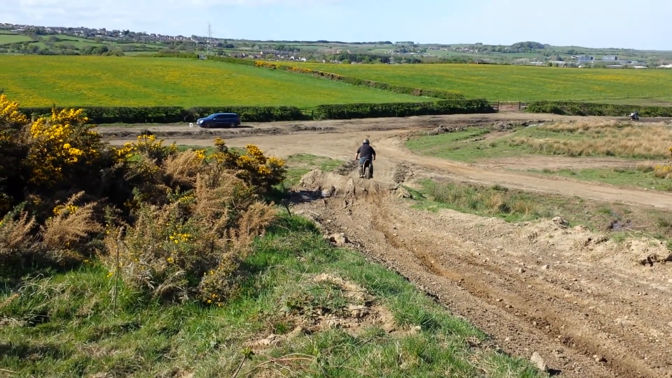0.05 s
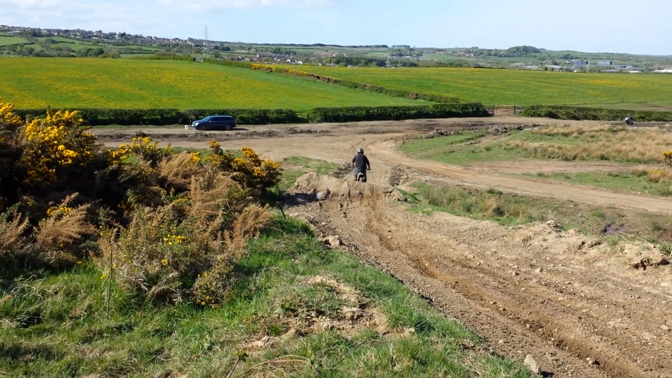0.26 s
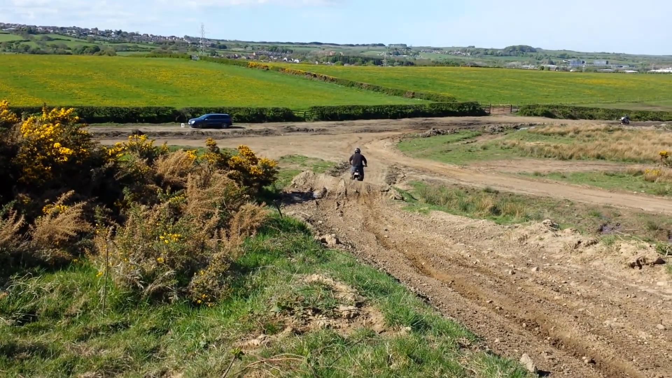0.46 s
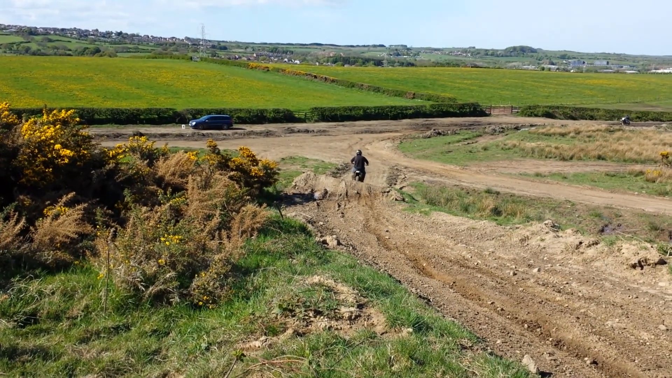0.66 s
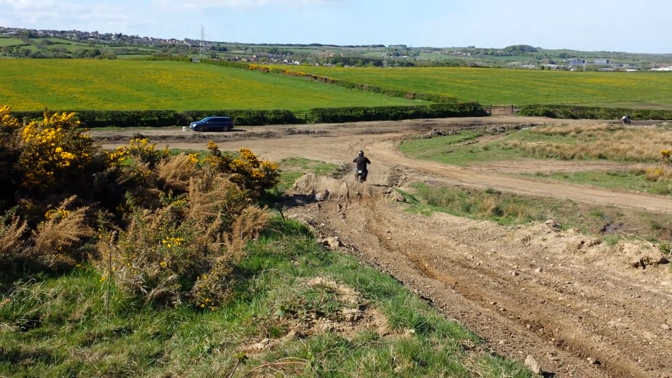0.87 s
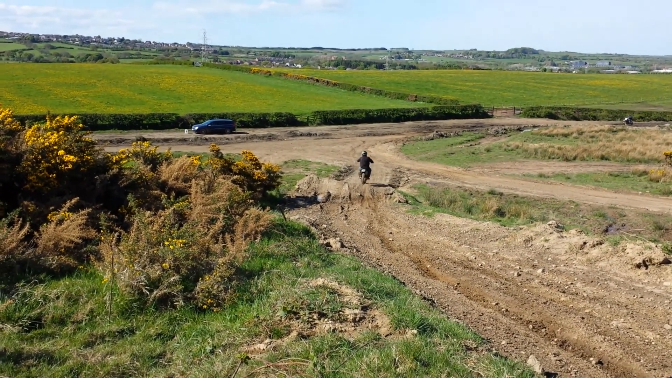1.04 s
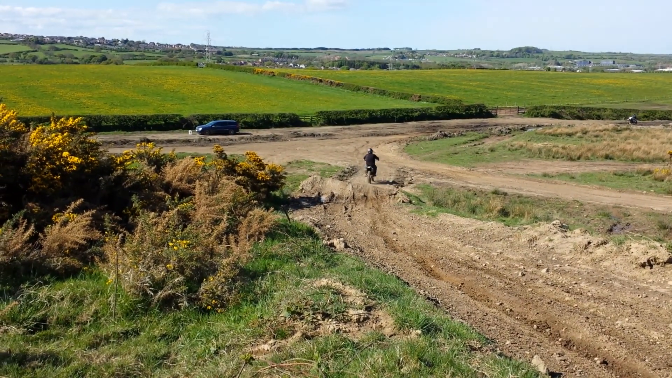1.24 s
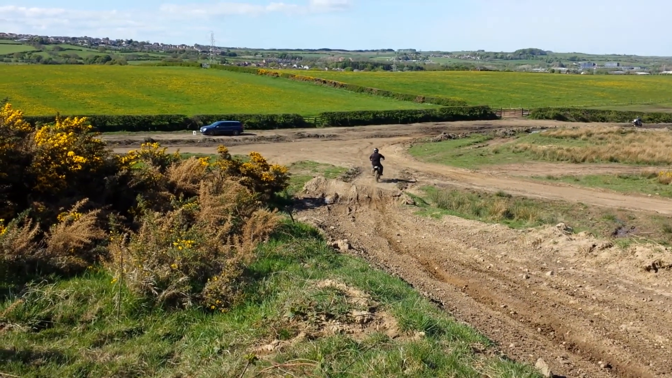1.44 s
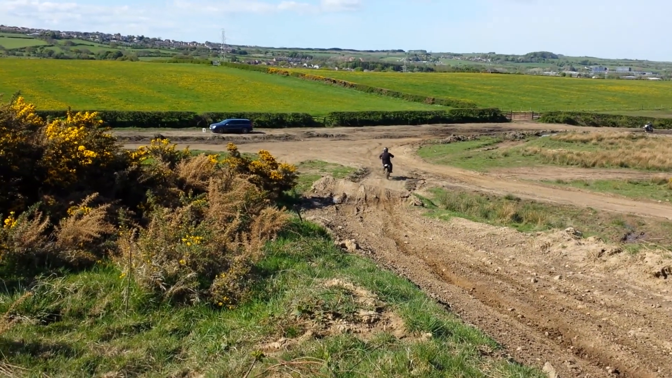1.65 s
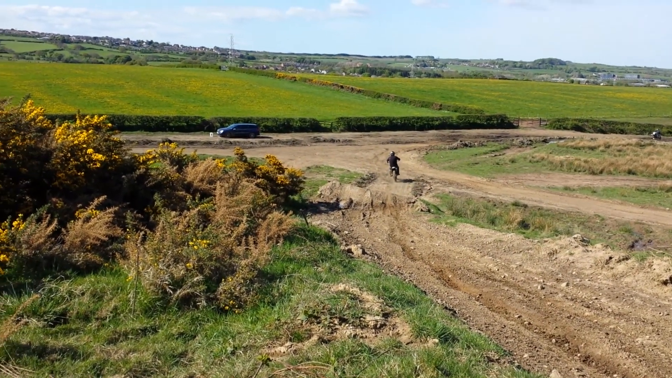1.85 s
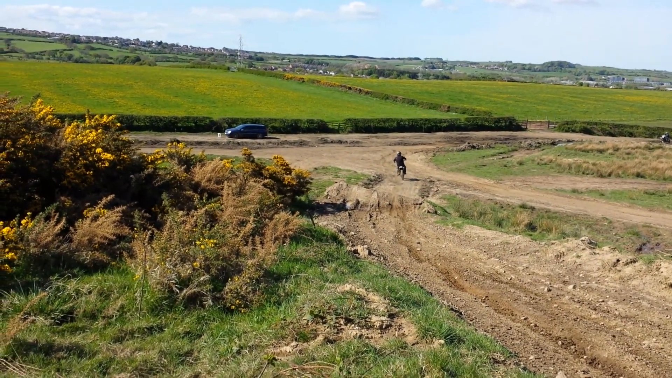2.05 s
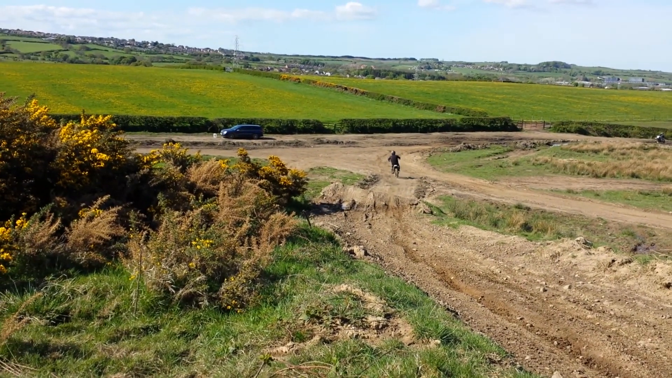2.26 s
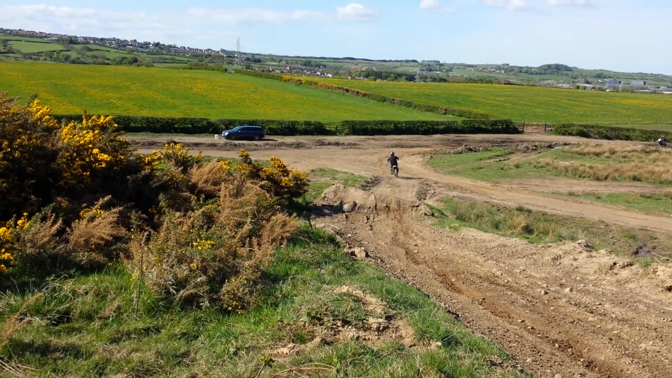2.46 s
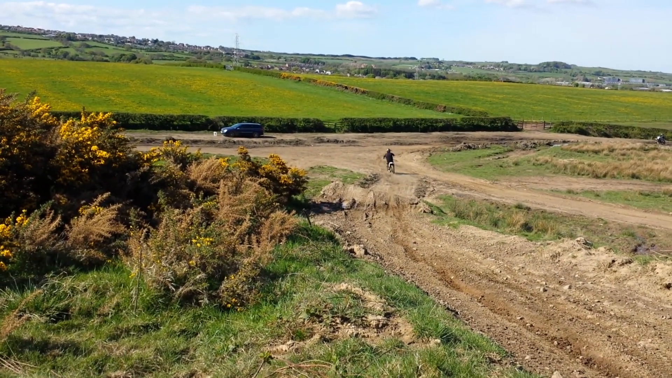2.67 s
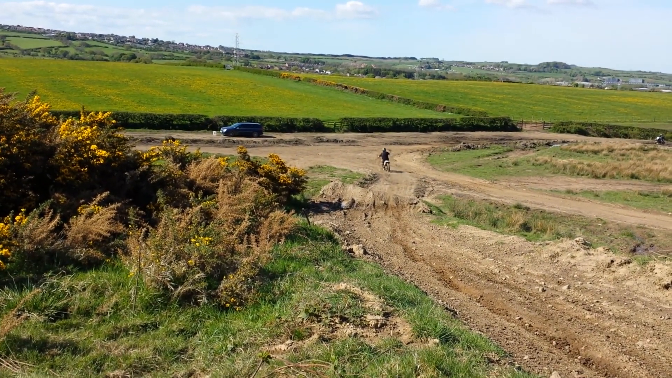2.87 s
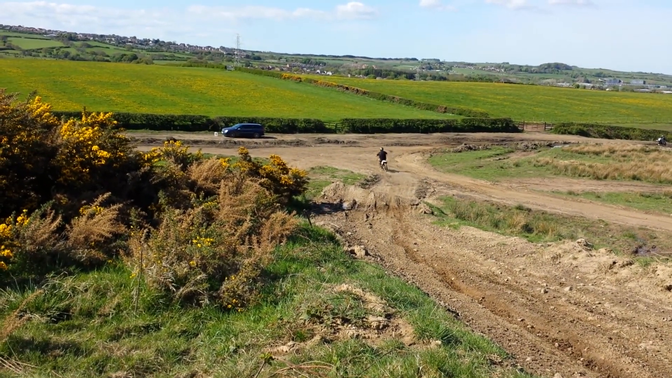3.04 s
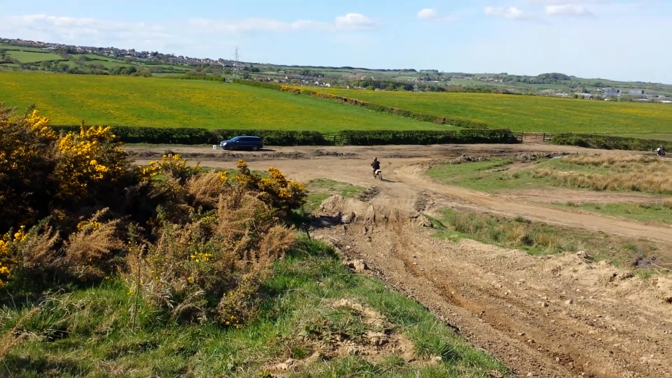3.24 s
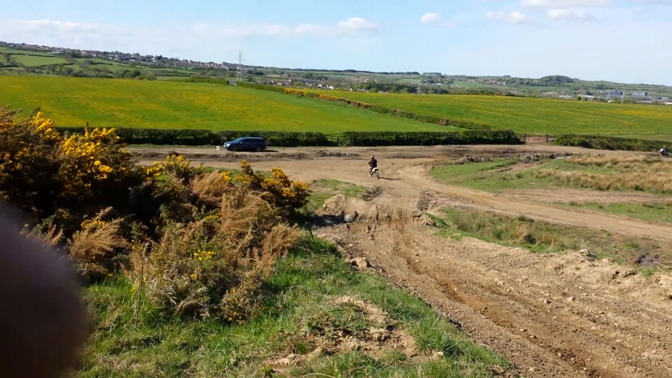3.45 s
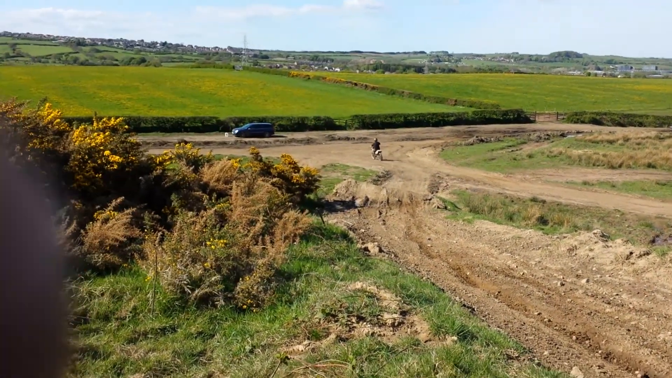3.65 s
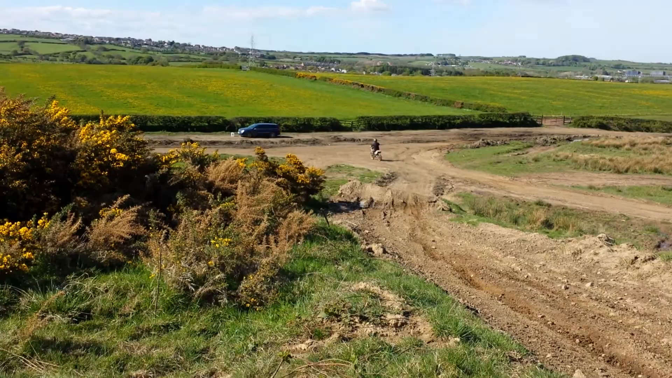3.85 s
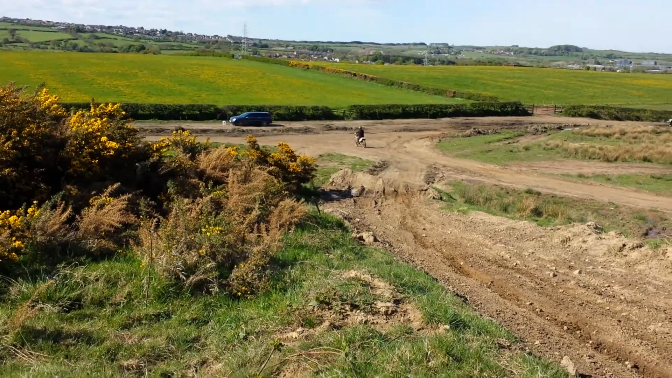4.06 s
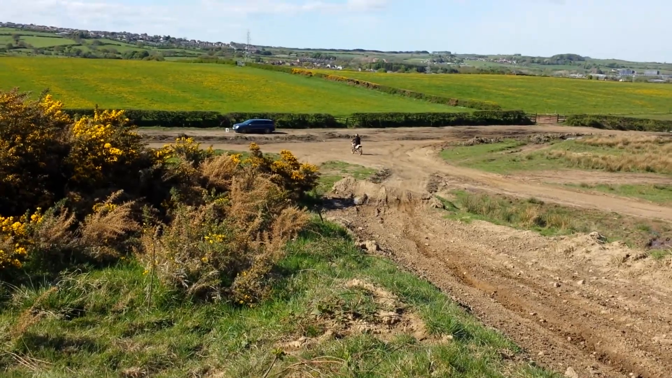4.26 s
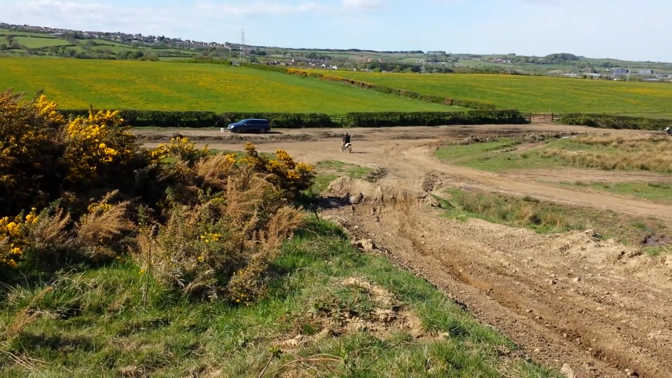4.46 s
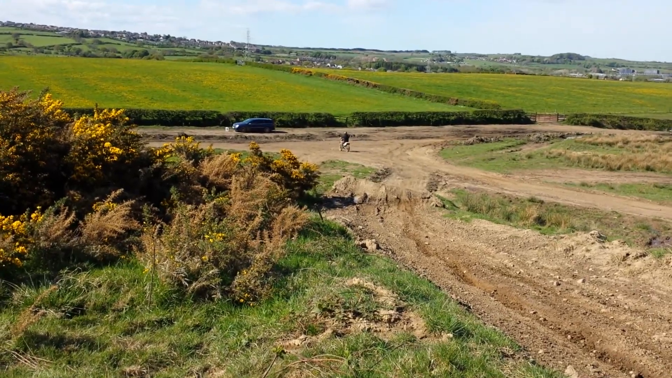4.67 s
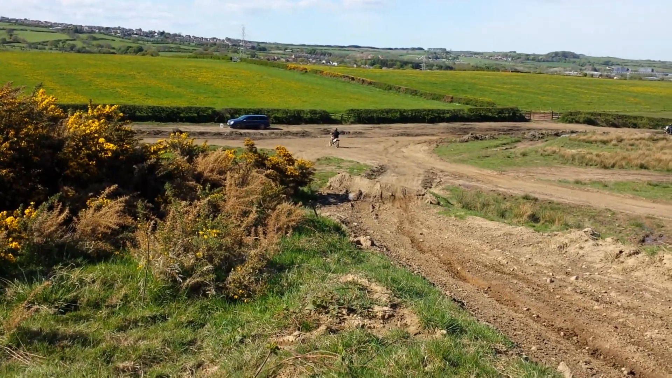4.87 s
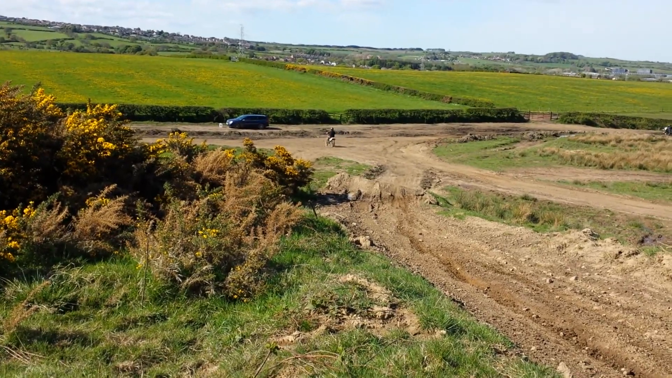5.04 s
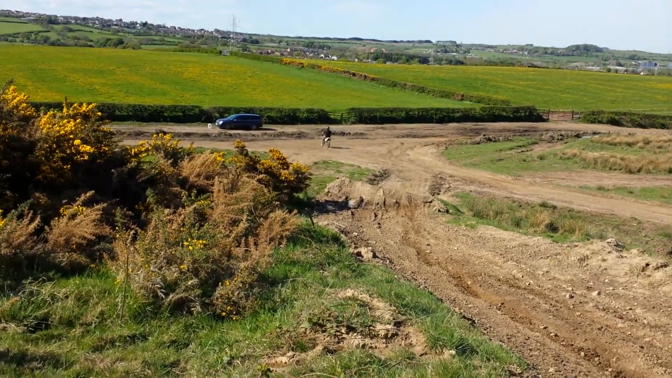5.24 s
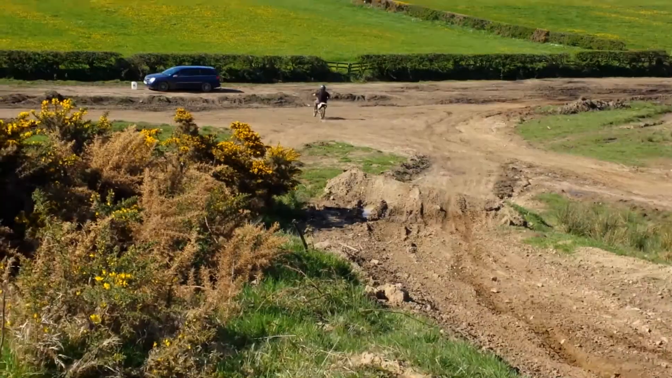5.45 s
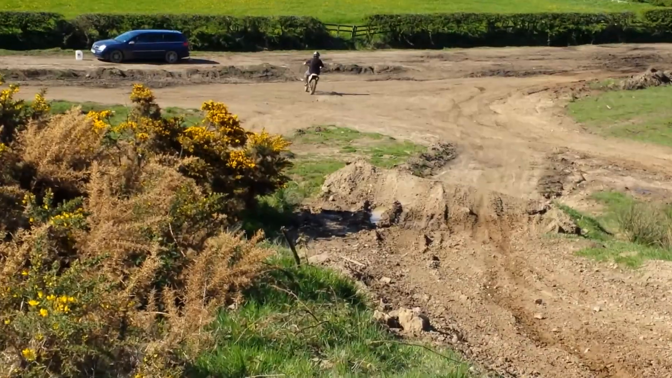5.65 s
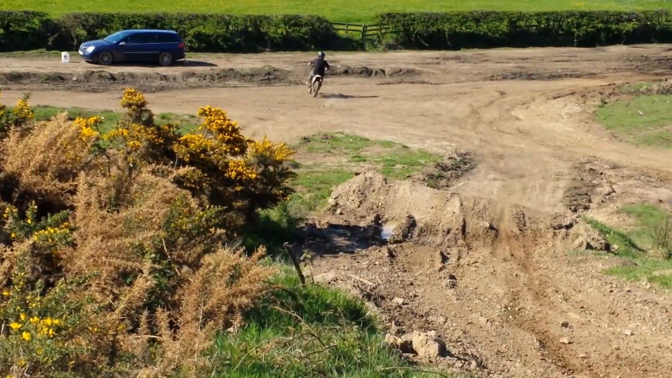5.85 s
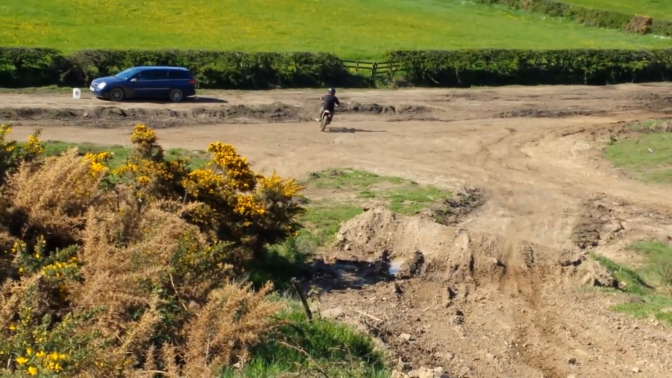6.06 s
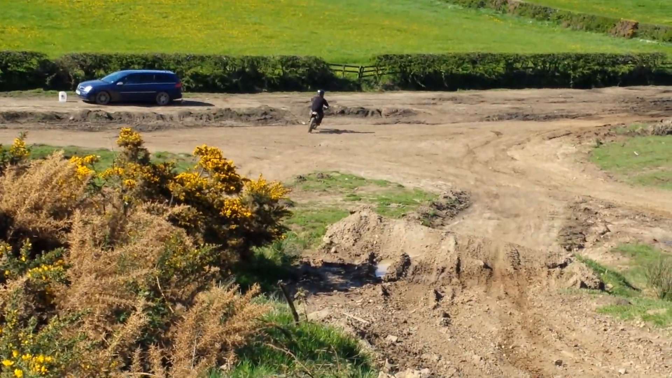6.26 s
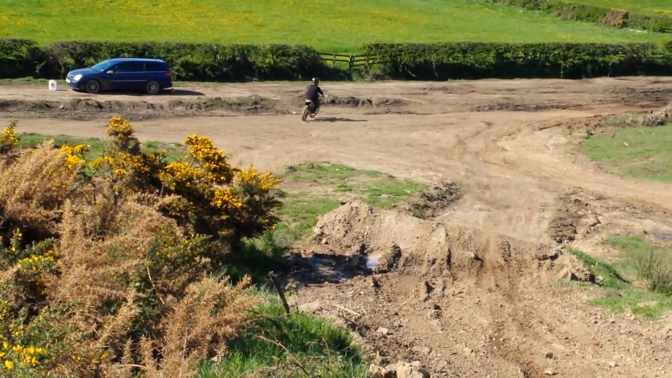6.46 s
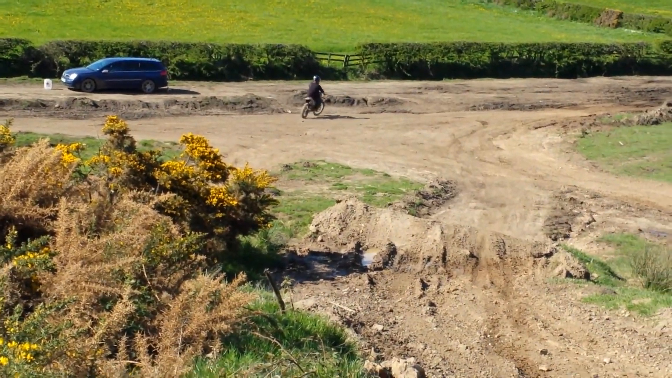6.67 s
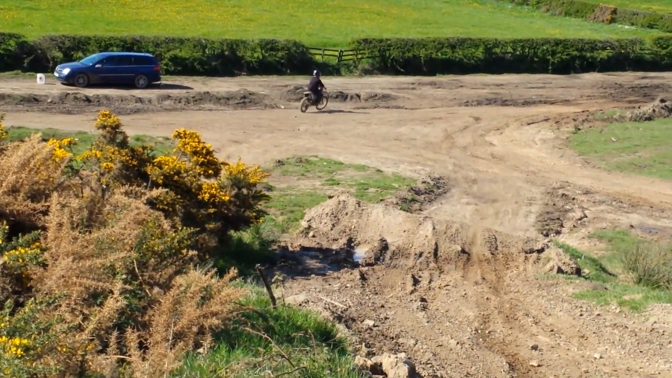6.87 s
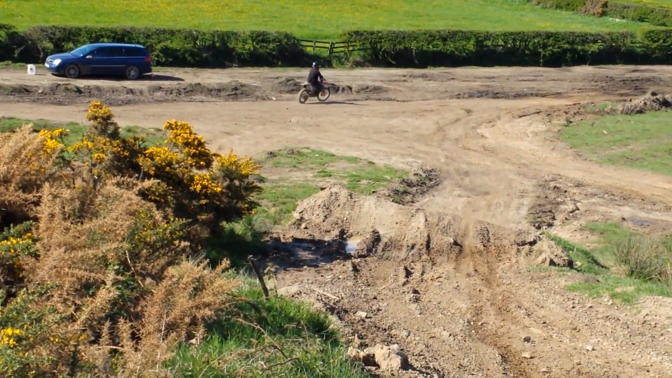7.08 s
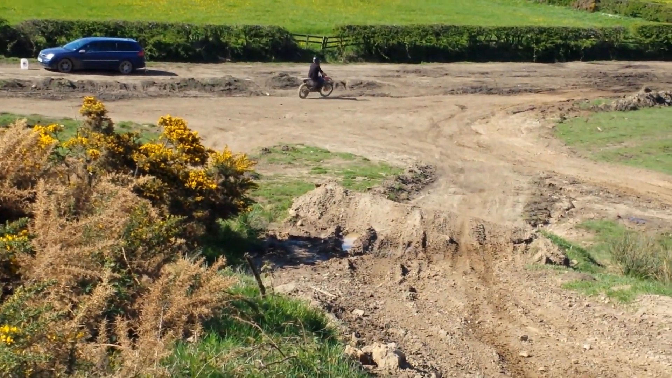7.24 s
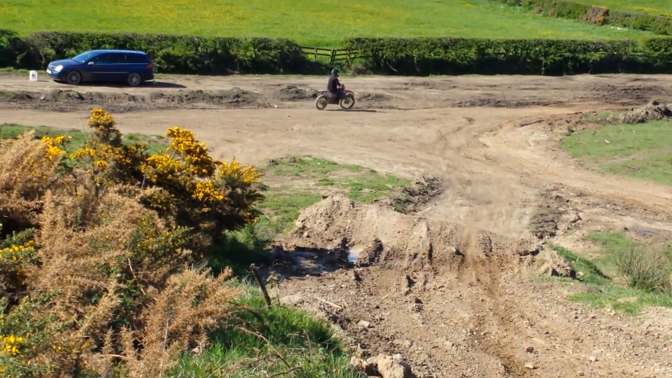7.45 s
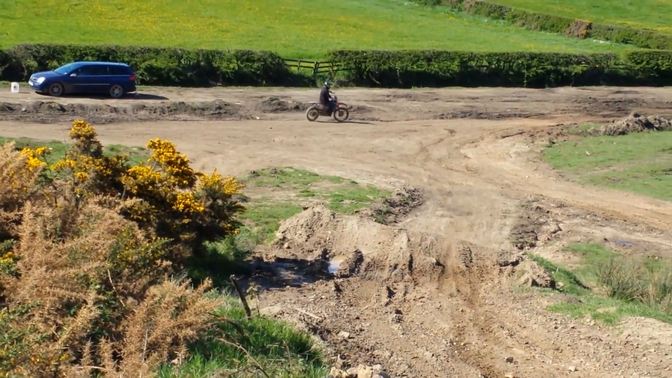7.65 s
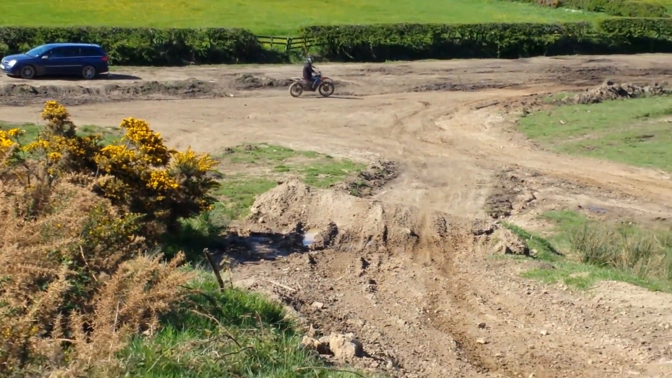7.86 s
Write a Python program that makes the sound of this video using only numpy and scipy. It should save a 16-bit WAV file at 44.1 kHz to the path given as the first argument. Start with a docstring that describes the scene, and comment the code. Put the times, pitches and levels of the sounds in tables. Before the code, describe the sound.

A single-cylinder dirt bike is already under throttle at 0 s, dips near 0.5 s, then pulls harder, its raspy bark peaking around 0.8-1.1 s. From about 1.4 s the throttle shuts: a long, steady overrun drones with irregular sharp exhaust pops until about 3.3 s, then grows quieter and lower, with a stray pop at 4.4 s. Tyres grind and hiss over dirt, with a thin wavering whine and howl; stones click at 4.6-5.1 s, fainter near 5.5 and 5.8 s. Revs sag from 5 s into a slow, uneven thumping idle with mechanical clatter by 7 s. A short twist at 7.7 s raises revs with two sharp pops. Low wind buffets the hand-held phone, mainly the right side, strongest near 1.4, 4.1 and 7.5 s. Fingers brush the case at 3.2-3.6 and 7.8 s. Open air, no echo.

```python
"""First the engine of a dirt bike pulls under two twists of throttle; a long popping overrun follows,
then a slow thumping idle and a last short twist. Each firing of its single cylinder rings the exhaust pipe
and lets out a rasp of gas; parts clatter, narrow bands of noise whine and howl, tyres grind over a farm
track and flick stones. Wind buffets the two ports of a hand-held phone, mostly the right one, and fingers
brush over its case."""
import sys
import numpy as np
from scipy import signal
from scipy.fft import rfft, irfft
from scipy.io import wavfile
from scipy.ndimage import uniform_filter1d

SR = 44100
rng = np.random.default_rng(int(sys.argv[2]) if len(sys.argv) > 2 else 0)


def digitize_waveform(pressure):
    """Quantize a signal to 16-bit integers and store it at the path in sys.argv[1].

    Rows of a 2-D input are taken as channels; values are limited to [-1, 1].
    """
    field = np.atleast_2d(pressure).T
    bounded = np.clip(field, -1, 1)
    quanta = np.round(bounded * 32767).astype(np.int16)
    wavfile.write(sys.argv[1], SR, quanta)


N = 348831
TIME = np.arange(N) / SR  # seconds
# Levels in the tables are relative: the function that plays a table may add its own trims in dB.


def undb(db):
    """Decibels to gain."""
    return 10 ** (np.asarray(db) / 20)


def curves(table, at=TIME):
    """The columns of a table, joined by straight lines in time."""
    seconds, *columns = np.transpose(table)
    return [np.interp(at, seconds, column) for column in columns]


def pan(db):
    """Left and right gains for a level difference, left minus right."""
    return undb(np.array([[db], [-db]]) / 2)


def response(points, size=4096):
    """A body's ring, of unit energy, that starts at once and has the given (Hz, dB) spectrum."""
    hz, db = np.transpose(points)
    f = np.maximum(np.arange(size // 2 + 1) * SR / size, 1)
    # beyond both ends of the table the spectrum falls by 24 dB an octave
    octaves_below = np.minimum(np.log2(f / hz[0]), 0)
    octaves_above = np.maximum(np.log2(f / hz[-1]), 0)
    spectrum_db = np.interp(np.log(f), np.log(hz), db) + 24 * (octaves_below - octaves_above)
    # folding the cepstrum forward in time puts the energy as early as it can be
    cepstrum = irfft(np.log(undb(spectrum_db)))
    cepstrum[1:size // 2] *= 2
    cepstrum[size // 2 + 1:] = 0
    ring = irfft(np.exp(rfft(cepstrum)))
    return ring / np.linalg.norm(ring)


def colour(x, points):
    """Pass a sound through a body with this spectrum."""
    return signal.fftconvolve(np.atleast_2d(x), response(points)[None], axes=1)[:, :N]


def noise(likeness):
    """White noise for left and right; likeness is their correlation, 0-1."""
    common, left, right = rng.standard_normal((3, N))
    return np.sqrt(likeness) * common + np.sqrt(1 - likeness) * np.array([left, right])


def walk(rate):
    """Smooth random drift of unit spread, with about this many new values a second."""
    k = max(int(SR / rate), 1)
    held = rng.standard_normal(N)[np.arange(N) // k]
    drift = uniform_filter1d(uniform_filter1d(held, k), k)
    return drift / drift.std()


def narrow(hz, db, width_hz):
    """A narrow band of noise with moving pitch and level: slow noise carried up to the pitch."""
    lowpass = signal.butter(2, width_hz / 2, fs=SR, output="sos")
    band = signal.sosfilt(lowpass, noise(0))
    carrier = np.exp(2j * np.pi * np.cumsum(hz) / SR)
    tone = ((band[0] + 1j * band[1]) * carrier).real
    return pan(-1.4) * tone / tone.std() * undb(db)


def cracks(table, body, decay_s, ring_db, likeness, level_db):
    """Short noisy cracks with the colour of a body, each with a resonance of its own."""
    out, air = np.zeros((2, N)), noise(likeness)
    age = TIME[:SR // 32]
    for s, db, hz, pan_db in table:
        i = int(s * SR)
        resonance = [(100, 0), (hz * .7, 0), (hz, ring_db), (hz * 1.4, 0), (SR / 2, 0)]
        ring = signal.fftconvolve(response(body), response(resonance))
        burst = air[:, i:i + len(age)] * age * np.exp(-age / decay_s)
        crack = signal.fftconvolve(burst, ring[None], axes=1)[:, :len(age)]
        out[:, i:i + len(age)] += pan(pan_db) * crack * undb(db + level_db) / abs(crack).max()
    return out


def puffs(firings, delay_s, decay_s, scatter_db, rise_s=0.0015):
    """An envelope that jumps at or shortly after each firing and dies away."""
    age = np.maximum(TIME[:SR // 10] - delay_s, 0)
    shape = np.exp(-age / decay_s) * (1 - np.exp(-age / rise_s))
    sizes = undb(scatter_db * rng.standard_normal(len(firings)))
    return signal.fftconvolve(np.bincount(firings, sizes, N), shape)[:N]


# Twists of the throttle. Each row: start in seconds, time held in seconds, opening 0-1.
TWISTS = [(0.0, 0.61, 0.64), (0.55, 0.74, 0.77), (7.72, .2, 0.66)]
# the wrist rolls on, eases off (share of the opening lost per second), then shuts to the idle stop
OPEN_S, CLOSE_S, EASE_PER_S, IDLE_THROTTLE = 0.31, 0.14, 0.43, 0.11


def throttle_at(t):
    """How far the throttle is open, 0-1: each twist rolls on, eases and shuts."""
    opening = 0
    for s, held, amount in TWISTS:
        rolled_on = np.clip((t - s) / OPEN_S, 0, 1)
        not_yet_shut = np.clip(1 - (t - s - held) / CLOSE_S, 0, 1)
        eased = 1 - EASE_PER_S * np.maximum(t - s - OPEN_S, 0)
        opening = opening + amount * rolled_on * not_yet_shut * eased
    return np.clip(IDLE_THROTTLE + (1 - IDLE_THROTTLE) * opening, 0, 1)


# Loudness of the silencer with the throttle shut.
# Each row: time in seconds, level of the thump in dB, level of the gas rasp in dB.
EXHAUST = [(0.0, -14, -40), (.52, -24.5, -49.5), (.7, -13.5, -50), (.93, -11, -43.5), (1.27, -11, -50.5),
           (1.42, -14, -42), (1.75, -13, -41.5), (2.1, -15, -42), (3.1, -15.5, -42.5), (3.42, -21.5, -46.5),
           (3.8, -20.5, -41.5), (4.4, -22, -55), (4.9, -22.5, -55), (5.7, -26.5, -54), (6.1, -26.5, -50.5),
           (6.75, -24, -70), (6.98, -21.5, -60.5), (7.91, -20, -41)]
THROTTLE_DB = 1.5  # louder by this much per unit of throttle opening


def effort(t):
    """Exhaust level in dB and throttle opening; more throttle is louder."""
    throttle = throttle_at(t)
    return curves(EXHAUST, t)[0] + THROTTLE_DB * (throttle - IDLE_THROTTLE), throttle


HISS_DB = -69


def microphone_hiss():
    """The microphones' own steady hiss, separate at each port."""
    return undb(HISS_DB) * noise(0)


# Gusts of wind. Each row: start in seconds, time held in seconds, level in dB.
GUSTS = [(.02, 0.058, -15), (.2, .49, -17.5), (1.37, 0.2, -13), (1.85, 0.81, -17), (2.23, 0.06, -14.5),
         (3.029, 0.38, -15.5), (3.631, 0.37, -18.5), (3.92, 0.035, -15), (4.025, 0.083, -10.5),
         (4.269, 0.057, -15), (4.68, 0.0049, -22), (5.2, 0.1, -25), (5.38, 0.02, -25), (6.13, 0.19, -16.5),
         (6.24, 0.044, -16), (7.15, .01, -25), (7.44, 0.12, -14), (7.68, 0.048, -14)]
GUST_RISE_S, GUST_FALL_S, CALM_DB = 0.053, 0.057, -39.5
# Spectra of the buffeting in a breeze and in a hard gust. Each row: frequency in Hz, level in dB.
BREEZE = [(25, -18), (60, -1.5), (140, 2.5), (250, -12), (350, -23.5), (470, -30.5), (650, -44),
          (1300, -51)]
GUST = [(25, -25.5), (90, -0.5), (175, 5), (260, -1.5), (400, -13), (570, -29), (720, -45.5), (1300, -53.5)]


def wind(right_db=0.0, left_db=-16, left_follow=0.62, flutter_db=1.0, ragged_db=4.0, pinned=0.48):
    """Separate eddies strike each port, harder on the right; hard gusts are brighter and flatten out.
    Returns the buffeting and the share of sensitivity that the loaded diaphragms keep."""
    power = undb(CALM_DB) ** 2
    for s, held, gust_db in GUSTS:
        away = np.maximum(s - TIME, 0) / GUST_RISE_S + np.maximum(TIME - s - held, 0) / GUST_FALL_S
        power = power + (undb(gust_db) * np.exp(-np.minimum(away, 20))) ** 2
    db = 10 * np.log10(power)
    hard = np.clip((db + 19.5) / 10, 0, 1)
    eddies = noise(0)
    buffet = (1 - hard) * colour(eddies, BREEZE) + hard * colour(eddies, GUST)
    # the left port is sheltered; the right one grows more ragged in hard gusts
    left_level = left_follow * db + left_db + flutter_db * walk(22)
    right_level = db + right_db + (flutter_db + ragged_db * hard) * walk(45)
    ports_db = np.array([left_level, right_level])
    overload = .6
    flattened = overload * np.tanh(buffet * undb(ports_db + 2.0) / overload)
    # the ports leak the deepest rumble away and round off the flattened crests
    ports = signal.butter(3, [42, 650], "bandpass", fs=SR, output="sos")
    return signal.sosfilt(ports, flattened), 1 - pinned * hard ** 3


# Sharp flaps of wind. Each row: time in seconds, level in dB.
FLAPS = [(2.01, -24), (2.289, -21), (2.66, -29.5), (3.102, -27.5), (3.21, -26), (3.35, -26), (3.768, -26.5),
         (3.944, -26.5), (4.0, -26.5), (4.02, -27), (4.045, -27), (4.073, -21), (4.11, -28.5), (4.29, -32),
         (4.335, -30), (5.162, -33.5), (6.14, -32), (6.255, -28.5), (6.289, -31), (7.457, -21.5),
         (7.482, -17), (7.52, -21), (7.538, -17)]
# Spectrum of a small, fast eddy. Each row: frequency in Hz, level in dB.
EDDY = [(150, -0.5), (300, 5), (450, -2.5), (650, -16), (900, -23), (1400, -42.5)]


def flaps(half_s=0.009, pan_db=-14):
    """Small, fast eddies flap mostly across the right port, each a short swell of noise."""
    swell = sum(undb(db) * np.exp(-((TIME - s) / half_s) ** 2) for s, db in FLAPS)
    return pan(pan_db) * colour(noise(0), EDDY) * swell


# Fingers brushing the case. Each row: middle in seconds, half length in seconds, level in dB,
# left minus right in dB, pressure 0-1.
BRUSHES = [(3.256, 0.049, -33, -24, 0), (3.414, 0.018, -44.5, -16, 0.96), (3.518, 0.055, -41, -4, 1),
           (3.591, 0.039, -35.5, -4, 0.9), (7.791, 0.12, -36.5, 2, 0)]
# Spectra of lightly sliding skin and of a firmly pressed fingertip. Each row: frequency in Hz, level in dB.
LIGHT_SKIN = [(600, -47), (1500, -6), (3000, 2.5), (5500, 5), (6500, 8.5), (8800, 9.5), (11500, 3.5),
              (14500, -1.5)]
FIRM_FINGERTIP = [(600, 2), (1300, -1), (2400, 1.5), (4000, -6.5), (8000, -7), (11500, -11), (14500, -42)]


def fingers():
    """Dry skin slides over the case in brief swelling hisses, duller where it presses harder."""
    light, firm = colour(noise(0.24), LIGHT_SKIN), colour(noise(0.21), FIRM_FINGERTIP)
    out = 0
    for s, half, db, pan_db, pressure in BRUSHES:
        swell = pan(pan_db) * undb(db) * np.exp(-abs((TIME - s) / half) ** 2.65)
        out = out + swell * (np.sqrt(1 - pressure) * light + np.sqrt(pressure) * firm)
    return out * undb(1.6 * walk(150))


def uneven_ring(x, ring_s=0.0023, ring_db=-6):
    """A short random tail gives the grit hiss a fixed, uneven ringing colour."""
    ring = rng.standard_normal(SR // 40) * np.exp(-TIME[:SR // 40] / ring_s)
    ring = ring * undb(ring_db) / np.linalg.norm(ring)
    ring[0] = 1  # the direct sound
    return signal.fftconvolve(x, ring[None] / np.linalg.norm(ring), axes=1)[:, :N]


# The ride. Each row: time in seconds, share of top speed, tyre roar in dB, grit hiss in dB.
RIDE = [(0.0, 0.92, -37, -46.5), (.55, 0.98, -48, -54), (1.2, 0.96, -41, -44), (1.7, 1, -45.5, -48.5),
        (2.7, 0.84, -49, -47), (3.7, 0.83, -41.5, -45.5), (5.0, .785, -41.5, -47), (5.6, 0.74, -47, -50),
        (6.7, 0.72, -53.5, -52.5), (7.91, 0.72, -48.5, -50)]
# Spectra of the tyre roar and of the grit hiss. Each row: frequency in Hz, level in dB.
TYRE_ROAR = [(200, -1.5), (420, 0), (560, -18), (780, 0.5), (1150, -1.5), (1500, -7.5), (1750, -7.5),
             (1960, -17.5), (2300, -11), (3200, -31), (6000, -36.5)]
GRIT_HISS = [(1500, -9.5), (2600, 3), (3300, 2.5), (4200, -2), (5400, -1.5), (7600, -4), (9500, -5),
             (11500, -13), (14500, -37)]


def tyres(gate, roar_db=-2.5, hiss_db=-2, spin_db=8, grain_db=2.0, pulsing=0.29):
    """Knobs grind over dirt; grit spray grows as throttle spins the wheel and pulses with the engine."""
    _, roar, hiss = curves(RIDE)
    load = throttle_at(TIME)
    ground = colour(noise(0.84), TYRE_ROAR) * undb(roar + roar_db - 2.0 * load + 2.4 * walk(25))
    # every 16 samples of hiss get a random size of their own, like single grains
    grain_size = rng.exponential(size=N // 16 + 1).repeat(16)[:N]
    grains = noise(.15) * undb(grain_db * grain_size)
    spray_db = hiss + hiss_db + spin_db * load ** 2 + 1.0 * walk(48)
    grit = uneven_ring(colour(grains / grains.std(), GRIT_HISS)) * undb(spray_db)
    return pan(-1.1) * ground + pan(0.36) * grit * (1 - pulsing + pulsing * gate)


# Flicked stones. Each row: time in seconds, peak level in dB, ring in Hz, left minus right in dB.
STONES = [(4.588, -26, 2487, -1), (4.7222, -21.5, 4075, -1), (4.832, -26.5, 4110, -5),
          (4.9029, -27.5, 4130, 1), (5.018, -19, 2095, 6), (5.076, -28.5, 5040, -3), (5.5068, -33, 3035, 3),
          (5.8181, -33, 2275, 2)]
# Spectrum of a struck stone. Each row: frequency in Hz, level in dB.
STONE_BODY = [(300, 6), (900, 15), (2200, 2), (4000, 10), (6000, -3), (9000, 2), (11000, -43), (14000, -43)]


def flicked_stones():
    """Stones flicked by the tyres crack, each ringing at its own pitch."""
    return cracks(STONES, STONE_BODY, decay_s=.001, ring_db=4, likeness=.55, level_db=3)


# Thin resonant bands of high hiss.
# Each row: middle in seconds, half length in seconds, pitch in Hz, level in dB.
HISS_BANDS = [(0.89, 0.7, 6100, -80), (1.05, 0.3, 7250, -50), (3.1, 0.75, 4580, -54.5),
              (2.2, 0.65, 5400, -61), (2.85, 0.5, 6620, -59), (3.71, 0.4, 2900, -56.5),
              (3.903, 2.24, 4014, -56.5), (4.74, 1.1, 4900, -62), (4.55, 1.8, 7700, -58.5)]


def hiss_bands(level_db=0, width_hz=300, wander=.006):
    """Thin resonant bands of high hiss come and go, all wandering together a little in pitch."""
    drift, out = 1 + wander * walk(3), 0
    for s, half, hz, db in HISS_BANDS:
        swell = np.exp(-((TIME - s) / half) ** 4)
        out = out + narrow(hz * drift, db + level_db, width_hz) * swell
    return out


# A whining narrow band. Each row: time in seconds, pitch in Hz, level in dB.
WHINE = [(0.0, 693, -58), (.5, 720, -47.5), (1.9, 820, -44), (3.1, 757, -50.5), (3.6, 739, -80),
         (6.0, 751, -53.5), (7.9, 720, -60.5)]
HOWL_HZ = 1420  # middle of the howl band where the speed curve is 1


def whine_and_howl(whine_db=2.5, howl_db=-6):
    """A whining narrow band drifts in pitch, fades, then returns near 750 Hz;
    the pitch of a noisy howl band follows the speed curve."""
    speed, roar, _ = curves(RIDE)
    whine_hz, whine_level = curves(WHINE)
    whine = narrow(whine_hz, whine_level + whine_db, width_hz=108)
    howl = narrow(HOWL_HZ * speed, roar + howl_db, width_hz=153)
    return whine + howl


# Spectra of the piston knock ringing the engine case and of the tappets ringing the cylinder head.
# Each row: frequency in Hz, level in dB.
KNOCK_CASE = [(600, -2), (790, 7), (1000, -1), (1350, 6.5), (1560, -0.5), (1750, 1), (1950, -2.5),
              (2200, 5), (2600, 5), (2830, -14), (3050, 6.5), (3300, -12.5), (4000, -1), (5000, -14.5),
              (7300, -25.5), (11000, -23.5)]
VALVE_HEAD = [(900, 3), (2500, 1), (3300, -12), (4100, 5), (4900, -6), (5400, -2.5), (5700, -15),
              (6100, -1), (7100, -15), (8300, -6), (12000, -19)]


def clatter(firings, lead_s=0.013, valve_db=-7, level_db=-29, slack_db=11.0):
    """Valves tick just before each thump, the piston knocks with it; slack parts rattle most at low revs."""
    ticks = np.maximum(firings - int(lead_s * SR), 0)
    valves = puffs(ticks, delay_s=0, decay_s=.012, scatter_db=3, rise_s=.002)
    knock = puffs(firings, delay_s=.001, decay_s=.010, scatter_db=2, rise_s=.001)
    labouring = np.clip((19 - curves(RATE)[0]) / 3, 0, 1)
    force_db = np.minimum(effort(TIME)[0], -20) + slack_db * labouring
    piston = colour(noise(0.66) * knock, KNOCK_CASE)
    tappets = undb(valve_db) * colour(noise(0.2) * valves, VALVE_HEAD)
    return pan(-2.3) * (piston + tappets) * undb(force_db + level_db)


# Pops in the exhaust. Each row: time in seconds, peak level in dB, ring in Hz, left minus right in dB.
POPS = [(1.323, -31, 1450, -3), (1.486, -18.5, 1950, 2), (1.519, -30, 1450, 2), (1.606, -29, 1476, 1),
        (1.8429, -26.5, 2370, 1), (1.936, -39, 1450, 0), (1.9682, -24, 1840, 0), (2.093, -31, 1432, 1),
        (2.4005, -21, 1850, -4.5), (2.56, -35, 1700, 3), (2.624, -31.5, 1790, 5), (2.6541, -24.5, 1420, 2),
        (2.752, -29.5, 1800, -2), (2.9385, -20.5, 2450, -4.5), (3.037, -31.5, 1800, 0),
        (3.3194, -24, 1580, -6), (4.4139, -25.5, 1370, -1), (7.8265, -17, 2840, -2),
        (7.871, -24.5, 2400, 4)]
# Spectrum of a pop in the silencer. Each row: frequency in Hz, level in dB.
POP_BODY = [(400, -18), (900, -11.5), (1350, -4.5), (1800, -2), (2000, -11), (2550, -2.5), (3100, -19.5),
            (4100, -17.5), (6000, -29), (11000, -54)]


def exhaust_pops():
    """Unburnt fuel pops in the pipe: short cracks, each ringing at its own pitch."""
    return cracks(POPS, POP_BODY, decay_s=.0013, ring_db=4.5, likeness=.75, level_db=5)


# Spectrum of the gas leaving the silencer. Each row: frequency in Hz, level in dB.
GAS_RASP = [(300, -6), (580, 5.5), (800, 0.5), (1000, -3), (1380, 11), (1550, 3.5), (1780, 8.5), (1970, -6),
            (2200, 6), (2620, 7), (2840, -1), (3050, -20.5), (4200, -17.5), (7300, -9.5), (13000, -20)]
# The hardest strokes under load. Each row: time in seconds, extra rasp in dB.
BARKS = [(.838, 5), (.867, 1.5), (.927, 4), (.956, 5), (.984, 3), (1.011, 1.5)]
# firings per second where the bark starts and where it is full, and the rasp it then adds
BARK_FROM_RATE, BARK_FULL_RATE, BARK_DB = 29, 33.5, 14


def rasp(firings, whirr_db=-13, level_db=-2.5):
    """Gas cracks out behind each pressure front; throttle and high revs turn its whirr into loud barks.
    Returns the sound and its pulsing envelope."""
    pulling = np.clip(2 * (throttle_at(TIME) - IDLE_THROTTLE), 0, 1)
    revving = np.clip((curves(RATE)[0] - BARK_FROM_RATE) / (BARK_FULL_RATE - BARK_FROM_RATE), 0, 1)
    bark = pulling * revving
    db = curves(EXHAUST)[1] + level_db + BARK_DB * bark
    for s, extra_db in BARKS:
        db = db + extra_db * np.exp(-((TIME - s - .002) / .005) ** 2)
    crack = puffs(firings, delay_s=.001, decay_s=.0045, scatter_db=1.2)
    tail = puffs(firings, delay_s=.008, decay_s=.005, scatter_db=2) / 4
    whirr = undb(whirr_db) * (1 - .7 * bark)
    gate = crack + tail + whirr
    gate = gate / np.sqrt(np.mean(gate ** 2))
    return colour(noise(0.68) * gate * undb(db), GAS_RASP) * pan(-5.5), gate


# Engine speed. Each row: time in seconds, firings per second.
RATE = [(0.0, 20.83), (0.11, 19.26), (0.28, 29.09), (0.78, 31.4), (0.95, 34.5), (1.02, 37.6), (1.07, 34.3),
        (1.15, 34.5), (1.27, 35.8), (1.32, 31.8), (1.47, 31.4), (1.58, 33.15), (1.72, 34.37), (1.96, 32.22),
        (3.24, 31.35), (3.33, 29.29), (4.84, 26.83), (5.07, 28.08), (5.2, 24.64), (5.6, 20.59),
        (6.38, 18.93), (6.87, 15.73), (7.06, 16.13), (7.3, 14.89), (7.8, 15.26), (7.91, 28.42)]
# Firings that catch an unusual charge, mostly a full one. Each row: time in seconds, extra level in dB.
HARD = [(.009, -4), (.2, 3), (.578, 3), (1.485, 4.5), (3.16, 3.5), (3.319, 4.5), (4.411, 7), (5.072, 3),
        (5.146, 3.5), (5.225, 3), (5.355, 3), (6.555, 1), (6.61, 2.5), (5.394, 6), (5.487, 5.5),
        (5.876, 6.5), (6.027, 7), (6.728, 5), (7.364, 1), (7.43, 2), (7.565, 0.5), (7.825, 6), (7.868, 8.5)]
# Spectra of the exhaust pipe with the throttle open, with it shut, after a feeble slow burn, at a slow
# tick-over, and of the first puff as the exhaust valve lifts. Each row: frequency in Hz, level in dB.
PIPE_OPEN = [(30, -40.5), (95, -19.5), (120, -1), (148, -2), (190, -3.5), (220, -17), (265, -3), (320, -9),
             (390, -28.5), (460, -14.5), (580, -40.5), (900, -39), (2500, -66)]
PIPE_SHUT = [(30, -27.5), (65, -8), (98, 0), (114, 5), (130, 3.5), (146, 5), (165, -2.5), (205, -6),
             (270, -7), (370, -33), (460, -36.5), (580, -44), (900, -41.5), (2500, -64.5)]
PIPE_WEAK = [(30, -42), (70, -5), (110, 2), (135, 22), (170, 3), (220, -6), (300, -11.5), (400, -48),
             (560, -105), (2500, -74)]
PIPE_IDLE = [(30, -25), (65, -6.5), (100, 2.5), (135, 8), (170, -2.5), (210, -1), (270, -5), (320, -13),
             (390, -33.5), (460, -24), (580, -60), (900, -46), (2500, -90)]
BLOWDOWN = [(80, -20.5), (150, 8), (280, -1), (400, -25), (800, -51.5)]


def engine(scatter_db=1.03, lumpy_db=2.0, exhaust_db=0.0, weak_below_db=-21,
           churn_db=-43, churn_tilt_db=-12, lift_s=0.00621, lift_db=-16):
    """One firing every second crank turn thumps the pipe; returns the sound and the samples where it fires."""
    rate, = curves(RATE)
    cycle = np.cumsum(rate) / SR - .2
    at = np.flatnonzero(np.diff(np.floor(cycle))) / SR
    size_chance, burn_chance, time_chance = rng.standard_normal((len(at), 3)).T
    level_db, throttle = effort(at)
    firing_rate = curves(RATE, at)[0]
    for s, extra_db in HARD:
        nearest = np.arange(len(at)) == np.argmin(abs(at - s))
        level_db = level_db + extra_db * nearest
    # an open throttle burns evenly; a shut one burns a different charge each time
    size = undb(level_db + scatter_db * (1 - throttle / 2) * size_chance) * np.sqrt(SR / firing_rate)
    burn = np.clip(throttle * undb(lumpy_db * (1.5 - throttle) * burn_chance), 0, 1)
    weak = np.clip((weak_below_db - level_db) / 5, 0, .8)
    jitter_s = .00015 + .0004 * (1 - throttle) * np.clip(firing_rate / 30, 0, 1) ** 2
    firings = np.clip(((at + jitter_s * time_chance) * SR).astype(int), 0, N - 1)
    # each firing is shared out between the pipe's spectra
    idle = np.clip((25 - firing_rate) / 5, 0, 1)
    coast = (1 - burn) * (1 - idle)
    shares = [(burn, PIPE_OPEN), (coast * (1 - weak), PIPE_SHUT),
              (coast * weak, PIPE_WEAK), ((1 - burn) * idle, PIPE_IDLE)]
    pipe = sum(colour(np.bincount(firings, size * share, N), spectrum) for share, spectrum in shares)
    # a soft puff escapes as the valve lifts, just ahead of the thump
    lifts = np.maximum(firings - int(lift_s * SR), 0)
    pipe = pipe + undb(lift_db) * colour(np.bincount(lifts, size * (1 - idle), N), BLOWDOWN)
    # gas churning in the pipe gives each thump its own tail, most of all at low revs
    fade = np.exp(-TIME[:SR // 10] / .018)
    stirred = signal.fftconvolve(np.bincount(firings, size * (1 - burn), N), fade)[:N]
    churn_level = churn_db + churn_tilt_db * np.log2(rate / 20)
    churn = colour(stirred * rng.standard_normal(N), PIPE_SHUT) * undb(churn_level)
    return pan(-0.72) * (pipe + churn) * undb(exhaust_db), firings


def scene():
    """Bike, track, wind and hand together; open fields give no echo."""
    exhaust, firings = engine()
    gas, gate = rasp(firings)
    machine = exhaust + gas + exhaust_pops() + clatter(firings)
    ride = whine_and_howl() + hiss_bands() + tyres(gate) + flicked_stones()
    left, right = machine + ride
    # the bike's sound reaches the left port two samples later
    bike = np.array([np.r_[0, 0, left[:-2]], right])
    buffeting, sensitivity = wind()
    return bike * sensitivity + buffeting + flaps() + fingers() + microphone_hiss()


TOP_HZ = 14600


def record(dry):
    """The phone passes the sound almost unchanged and cuts the top."""
    ceiling = 6.7  # far above the peaks
    limited = ceiling * np.tanh(dry / ceiling)
    return signal.sosfilt(signal.ellip(10, .2, 80, TOP_HZ, fs=SR, output="sos"), limited)


dry = scene()
out = record(dry)
digitize_waveform(out)
```